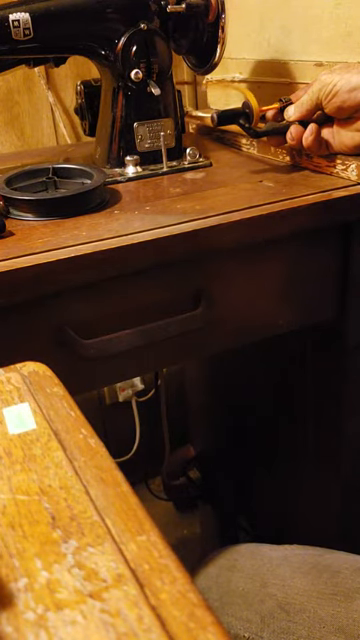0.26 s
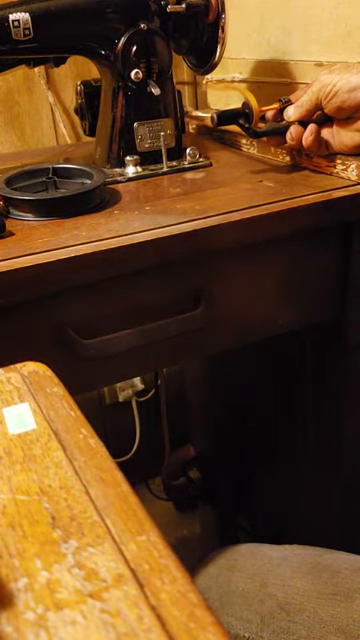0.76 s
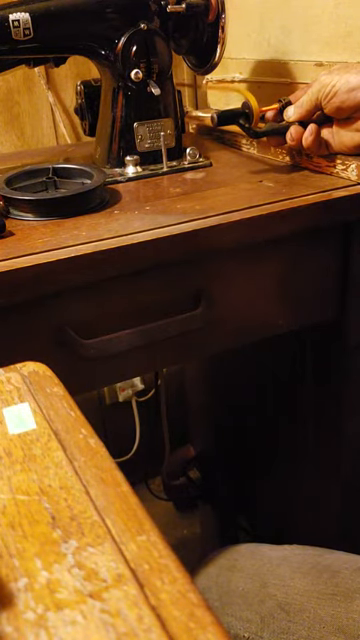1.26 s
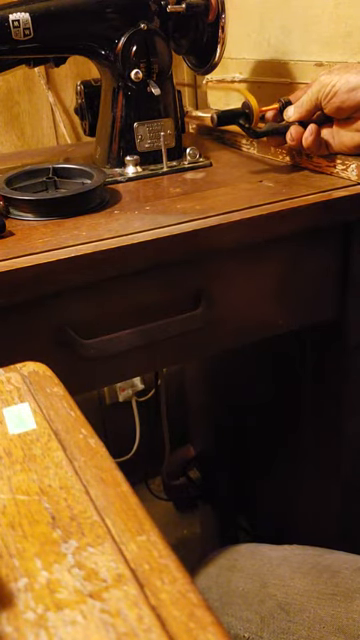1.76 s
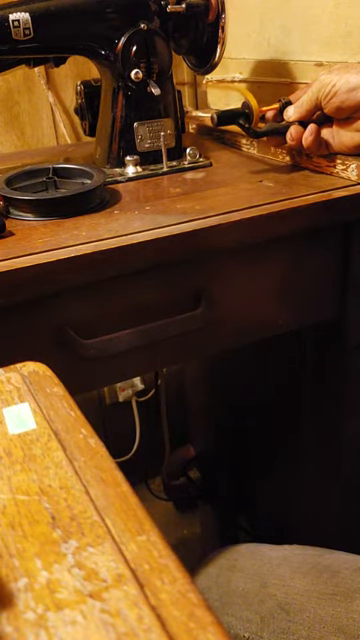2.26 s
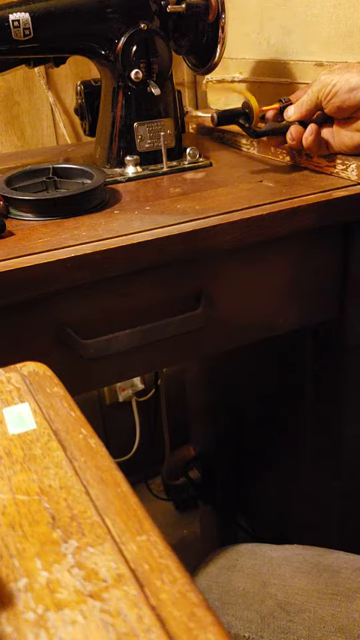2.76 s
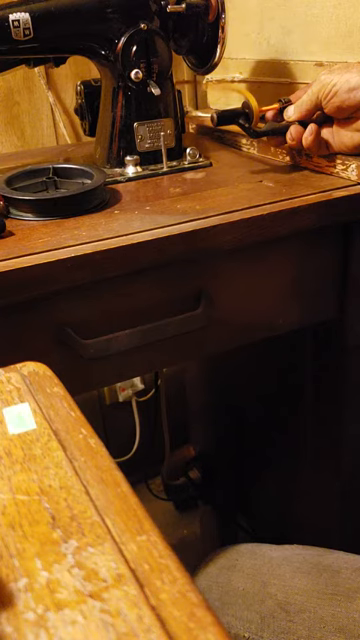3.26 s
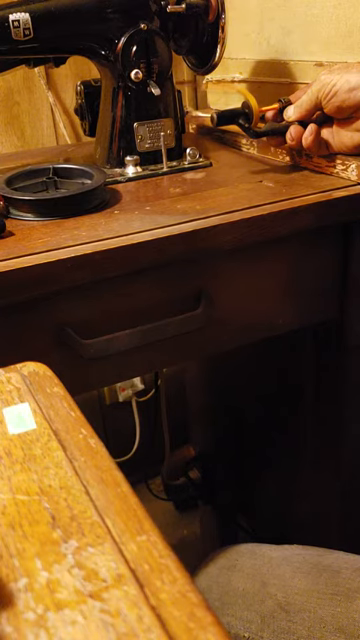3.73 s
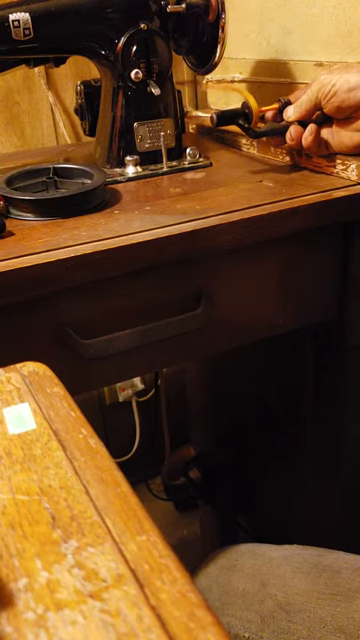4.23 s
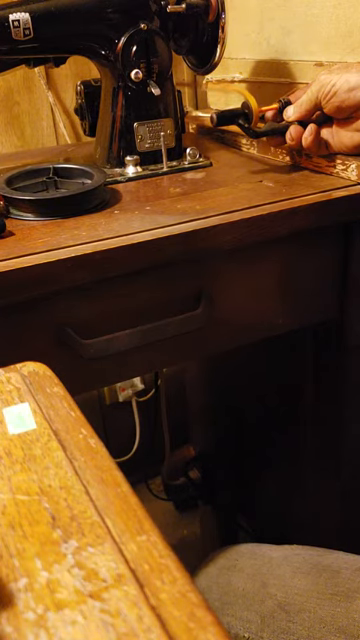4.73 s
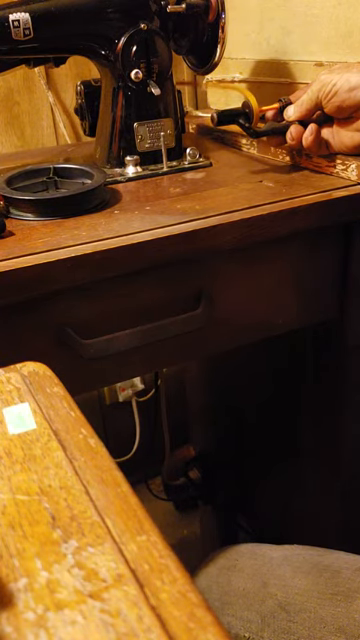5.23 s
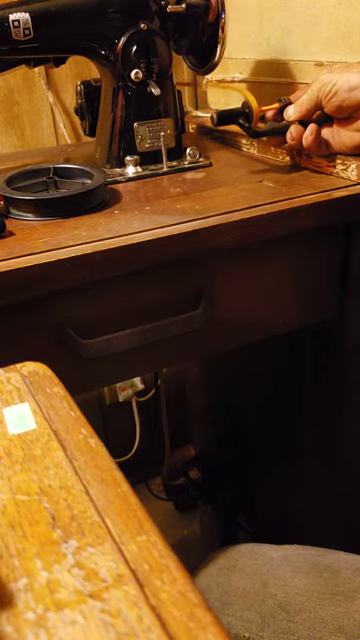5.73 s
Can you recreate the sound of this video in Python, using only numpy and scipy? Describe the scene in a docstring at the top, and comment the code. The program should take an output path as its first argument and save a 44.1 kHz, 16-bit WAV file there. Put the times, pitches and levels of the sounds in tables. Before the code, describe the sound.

An old sewing machine's small electric motor runs without a break while winding a bobbin. A strong low hum dominates, with thin metallic whines and brush hiss above. Pitch rises noticeably during the first second, then only creeps upward. A few faint rubs appear around two, three and five seconds. Close stereo pickup in a quiet room, treble brighter on the left.

```python
"""A small electric motor hums and whines as it speeds up to almost 200 turns a second, winding a bobbin on an
old sewing machine. Its unbalanced rotor hums through the table and shaft orders whine in the housing:
both are sines locked to one shaft angle. Brushes and fan hiss as coloured noise, with faint mains lines,
wavering lines under the low orders and a few soft rubs.
The left microphone port faces the motor; the right one is shadowed in the treble."""
import sys
import numpy as np
from scipy import signal
from scipy.fft import rfft, irfft, next_fast_len
from scipy.io import wavfile
from scipy.ndimage import uniform_filter1d, map_coordinates

SR = 44100
rng = np.random.default_rng(int(sys.argv[2]) if len(sys.argv) > 2 else 0)


def transcribe(u):
    """Save the signal u as a 16-bit wav file named by the first command-line argument.

    u: samples, shape (n,) or (channels, n), limited to [-1, 1]; the rate is SR.
    q: integer samples, one column per channel.
    """
    v = np.clip(np.atleast_2d(u).T, -1, 1)
    q = np.round(v * 32767).astype(np.int16)
    wavfile.write(sys.argv[1], SR, q)


N = 264159
PORT_GAP_S = 0.00048  # sound reaches the left port this much earlier

# Upper shaft orders and the housing resonances they cross, levels at the peak:
# (order, left [dB], right [dB], resonance [Hz], width [Hz])
WHINE_LINES = [(5, -51.5, -52.5, 947, 20), (6, -57, -53, 1174, 7), (7, -48, -43, 1309, 22),
               (10, -53.1, -71.9, 1945, 15), (10, -49.9, -74.9, 1967, 11), (12, -52.5, -56, 2270, 90),
               (12, -53.0, -61.3, 2359, 11), (12, -52.6, -60.6, 2332, 21), (12, -51, -52.5, 2368, 11),
               (14, -50.5, -61, 2555, 30), (14, -51.5, -63, 2735, 110), (15, -50.6, -64.4, 2895, 57),
               (16, -52.4, -62.3, 3155, 40), (17, -53, -62, 3350, 70), (19, -45.5, -60, 3605, 80),
               (19, -52, -61, 3730, 50), (21, -50.5, -63.1, 4135, 16), (21, -47.7, -72.7, 4200, 45),
               (23, -51.5, -64.5, 4540, 21), (24, -45.5, -62.2, 4725, 43), (25, -47.0, -58.9, 4993, 37),
               (27, -46.5, -60, 5290, 90), (27, -42, -53.8, 5400, 24), (28, -50.1, -64.7, 5475, 142),
               (30, -47.0, -68.7, 5710, 27), (30, -50.5, -66, 5870, 160), (31, -47, -65.2, 5800, 150),
               (32, -42.9, -60.6, 5792, 288), (34, -45.5, -60, 6445, 75), (34, -44.7, -58.7, 6788, 55),
               (36, -48.5, -70.3, 6930, 300), (37, -43.5, -60, 7015, 130), (37, -42, -59.7, 7280, 60),
               (39, -47, -65, 7230, 150), (39, -40.5, -57.7, 7634, 40), (40, -48, -62, 7830, 30),
               (43, -51.3, -62.8, 8458, 39), (44, -43.5, -56, 8500, 50), (44, -46.5, -55, 8635, 100),
               (45, -50.9, -59.3, 8634, 94), (47, -55.1, -63.7, 9000, 1200), (52, -47.5, -74.6, 10198, 86),
               (55, -43, -69.4, 10846, 171), (56, -45, -71.7, 10840, 170), (63, -42, -69.8, 12501, 219),
               (65, -41.3, -66.3, 12861, 58), (66, -44, -66, 12430, 130), (66, -38.8, -63.8, 13012, 59),
               (67, -45.9, -54.7, 13287, 68), (67, -43.3, -68.3, 13099, 475), (73, -39, -51, 14075, 70),
               (73, -36.1, -55.5, 14442, 66), (75, -39, -56, 14440, 90), (76, -41.5, -56, 14500, 500),
               (77, -40.5, -56, 14830, 60), (77, -35.5, -47.0, 15155, 160), (78, -37.5, -47.8, 15320, 80)]
# Strongest upper orders, before the motor shell colours them:
# (order, left level [dB], right against left [dB], left port's lead beyond the port gap [rad])
STRONG_LINES = [(11, -45.4, -4, -.9), (18, -63.2, -13, -1.6), (22, -27.2, -25, 0), (29, -63.3, -25, 0),
                (33, -28.5, -19, 0), (38, -40, -20, 0)]


def amp(db):
    """Decibels to linear gain."""
    return np.exp(np.asarray(db) * (np.log(10) / 20))


def unit(x):
    """Scale to an rms of one."""
    return x / np.sqrt(np.mean(x ** 2) + 1e-20)


def along(points, hz):
    """Interpolate (frequency [Hz], value) points on a log frequency axis."""
    f, v = np.transpose(points)
    return np.interp(np.log(hz + 1), np.log(f + 1), v)


def wobble(rate):
    """A smooth random curve with rate knots a second."""
    knots = rng.standard_normal(int(N * rate / SR) + 4)
    # a spline through the knots every 64 samples, then straight lines between
    coarse = map_coordinates(knots, [np.arange(0, N + 64, 64) * rate / SR])
    return np.interp(np.arange(N) / 64, np.arange(len(coarse)), coarse)


def filtered(x, response):
    """Shape the spectrum of x by a response of frequency."""
    m = next_fast_len(N + 8192)
    spectrum = rfft(x, m) * response(np.fft.rfftfreq(m, 1 / SR))
    return irfft(spectrum, m)[..., :N]


def tone(phase, lead, db):
    """A sine of rms level db at both ports, the left leading by lead radians."""
    return np.sqrt(2) * amp(db) * np.sin([phase + lead / 2, phase - lead / 2])


def bell(hz, centre, width):
    """A resonance curve: one at its centre, a half at half its width away."""
    return 1 / (1 + (2 * (hz - centre) / width) ** 2)


def response_db(rows, hz):
    """Peaks and dips (centre [Hz], width [Hz], one or more [dB]) summed at the given frequencies."""
    return sum(np.array(db)[:, None] * bell(hz, c, w) for c, w, *db in rows)


def random_phase():
    """A random starting phase in radians."""
    return rng.uniform(0, 2 * np.pi)


def patchy_noise():
    """Two independent noises whose levels swell and sink together in patches of time and frequency."""
    z = signal.stft(rng.standard_normal((2, N)), nperseg=512)[2]
    patches = rng.standard_normal(z.shape[1:])
    patches = uniform_filter1d(patches, size=5, axis=0)   # across frequency
    patches = uniform_filter1d(patches, size=12, axis=1)  # across time
    return signal.istft(z * amp(1.36 * unit(patches)), nperseg=512)[1][:, :N]


def brush_scrape(angle):
    """Brushes scrape a pattern that returns every turn: many shaft orders, each slowly varying in level."""
    # leave out order 20 and the orders that whine by themselves
    taken = [20] + [row[0] for row in [*WHINE_LINES, *STRONG_LINES]]
    orders = np.setdiff1d(np.arange(14, 81), taken)
    return sum(amp(3.5 * wobble(1.6)) * np.sin(k * angle + random_phase()) for k in orders)


def hiss(angle):
    """Brush and fan noise pulses with the shaft and reaches the two ports coloured and only partly alike."""
    # Broad hiss at each port, before the peaks and dips: (frequency [Hz], density [dB per Hz])
    left_hiss = [(20, -79), (120, -80.5), (310, -72.5), (420, -79), (1000, -83.5), (1500, -83.5),
                 (2400, -76), (4000, -77.5), (4800, -73.5), (7300, -74.5), (9000, -79), (11500, -75.5),
                 (14000, -66), (15700, -65)]
    right_hiss = [(20, -76.5), (120, -83), (310, -81), (550, -77), (950, -80), (1500, -79.5), (2200, -75.5),
                  (3000, -86.5), (6300, -89), (7000, -99), (7800, -78), (9500, -88), (12000, -94),
                  (12700, -93), (13400, -77.5), (15500, -79)]
    # Peaks and dips in the hiss spectrum: (centre [Hz], width [Hz], against the broad hiss [dB])
    peaks_and_dips = [(32.6, 5.9, 3), (190, 88, 11), (302, 48, -16), (963, 46, -7), (1220, 660, 6),
                      (1784, 153, -5), (2260, 90, -11), (2475, 99, -15), (2640, 1500, 2.5), (3015, 85, -10),
                      (3590, 113, 9.5), (3940, 90, -7), (4420, 90, 0), (5720, 36, 7), (6650, 66, -8),
                      (7220, 90, -8), (7210, 450, 7.5), (8130, 170, -3), (9000, 120, 0), (11900, 170, 5),
                      (14430, 200, 6)]
    # Likeness of the noise at the two ports: (frequency [Hz], left-right correlation [0 to 1])
    likeness = [(60, 0.9), (250, 0.85), (600, 0.26), (1500, 0.58), (3000, 0.1), (8000, 0.098),
                (15000, 0.19)]

    pulsing = 1 + .07 * np.sin(angle) + .07 * np.sin(2 * angle)
    pair = patchy_noise() * pulsing + .09 * brush_scrape(angle) * np.array([[1], [.3]])

    def mid_side_mix(hz):
        turn = np.arccos(np.clip(along(likeness, hz), -1, 1)) / 2
        return np.array([np.cos(turn), np.sin(turn)])

    def colour(hz):
        early_left = np.exp(1j * np.pi * hz * PORT_GAP_S * np.array([[1], [-1]]))
        hiss_db = np.array([along(left_hiss, hz), along(right_hiss, hz)])
        return early_left * amp(hiss_db + response_db(peaks_and_dips, hz))

    mid, side = filtered(pair, mid_side_mix)
    # the factor turns white noise of unit rms into unit density per Hz
    return np.sqrt(SR / 2) * filtered(np.array([mid + side, mid - side]), colour)


def field(angle):
    """The magnetic field pulses at twice the mains rate: a hum, and lines split off the shaft orders."""
    field_hz = 119.9
    # Split lines, mean levels; order 0 is the plain hum: (order, side [+1 above, -1 below], left [dB], right [dB])
    split_lines = [(0, 1, -58, -58), (2, -1, -65, -65), (3, -1, -68, -66), (5, -1, -66, -65),
                   (6, 1, -63, -56), (14, -1, -57, -65), (19, -1, -54, -70)]
    out = np.zeros((2, N))
    pulse = 2 * np.pi * field_hz * np.arange(N) / SR
    for k, side, left_db, right_db in split_lines:
        level = np.array([[left_db], [right_db]]) + 1.6 * wobble(1.41) + 3.2 * wobble(16)
        phase = k * angle + side * (pulse + 0.4 * wobble(16)) + random_phase()
        out += tone(phase, rng.uniform(0, k), level)
    return out


def belt(angle):
    """Faint lines, perhaps from the belt, waver in phase and level about a quarter order under low orders."""
    # Belt lines, mean levels: (multiple of shaft speed, level [dB])
    belt_lines = [(2.76, -60), (3.76, -67)]
    return sum(tone(k * angle + 1.0 * wobble(12), 0, db + 1.1 * wobble(4.9)) for k, db in belt_lines)


def rubbing():
    """Soft rubs near 1.3 kHz: short tones rough in pitch and level, quick to start, stronger on the right."""
    # Rubs, mean rms level at the envelope's top, right port: (time [s], length [s], pitch [Hz], level [dB])
    rub_events = [(1.97, .045, 1140, -52), (1.98, .045, 1295, -46), (2.02, .03, 1440, -47),
                  (2.17, .02, 1130, -52), (3.1, .05, 1120, -55), (3.14, .05, 1350, -50),
                  (3.3, .022, 1300, -47), (3.39, .025, 1290, -45), (3.39, .03, 1130, -50),
                  (5.25, .08, 1300, -53)]
    t = np.arange(N) / SR
    rubs = np.zeros(N)
    for start, length, hz, db in rub_events:
        u = (t - start) / length
        envelope = np.exp(-np.where(u < 0, u ** 4, u ** 2))  # steeper rise than fall
        rough_tone = np.sin(2 * np.pi * hz * t + 1.3 * wobble(100))
        rubs += amp(db + 2.5 * wobble(70)) * envelope * rough_tone
    return np.sqrt(2) * rubs * amp([[-6], [0]])


def whine(angle, speed):
    """Upper orders swell near housing and shell resonances; a slight shaft shudder widens the high ones."""
    # Motor shell peaks and dips that the strongest orders sweep through: (centre [Hz], width [Hz], gain [dB])
    shell = [(2022.9, 34.3, -28.6), (2089.8, 37.4, -8.4), (2128.1, 10.3, -6.4), (2174, 11.7, -6.5),
             (3464.1, 15.2, -9.9), (3536.7, 7.7, -5.2), (3539.0, 131.0, 23.2), (3548.5, 6.4, 4.1),
             (3572.3, 10.0, 6.7), (4043.8, 241.5, -16.5), (4050, 70, -8), (4223.1, 90.8, -13.5),
             (4262, 20, -9.5), (4385.5, 73.0, -12.4), (5593.5, 3.8, -31.0), (5624.7, 22.5, 4.0),
             (5711.7, 179.4, 26.5), (6035, 60, -13), (6159.9, 456.3, -17.5), (6355.7, 55.5, -11.7),
             (6390.1, 4.1, -31.0), (6438.3, 11.2, -7.0), (6521.9, 79.6, -12.4), (6974.3, 140.0, -9.8),
             (7122.8, 120.1, -8.5), (7432.2, 6.0, -3.0), (7519.4, 11.2, -31.0), (7531.8, 101.6, -9.2)]
    # Phase of some housing orders: {order: left port's lead beyond the port gap [rad]}
    extra_lead = {5: -.9, 7: .8, 10: -1.5}

    lines = []
    for k, left_db, right_offset_db, lead in STRONG_LINES:
        level = left_db + np.array([[0], [right_offset_db]]) + response_db(shell, k * speed)
        lines.append((k, level, lead))

    # an order that crosses several resonances adds up their powers
    power = {}
    for k, left_db, right_db, hz, width_hz in WHINE_LINES:
        near_db = np.maximum(10 * np.log10(bell(k * speed, hz, width_hz)), -20)
        power[k] = power.get(k, 0) + amp(2 * (np.array([[left_db], [right_db]]) + near_db))
    for k, p in power.items():
        lines.append((k, 10 * np.log10(p) + 1.6 * wobble(2.42), extra_lead.get(k, 0)))

    out = np.zeros((2, N))
    shaken = angle + .0025 * wobble(60)
    for k, db, lead in lines:
        lead = lead + 2 * np.pi * k * speed * PORT_GAP_S + 0.6 * wobble(0.83)
        out += tone(k * shaken + random_phase(), lead, db + .9 * wobble(30))
    return out


def hum(angle, speed):
    """The unbalanced rotor's low orders are nearly steady sines, coloured by a slightly trembling table and frame."""
    # Low shaft orders before the frame colours them: (order, left [dB], right [dB])
    low_orders = [(1, -19.5, -20.6), (2, -71.1, -73), (3, -65.8, -65), (4, -38.3, -32.9), (8, -37.7, -40.4)]
    # Table and frame peaks and dips: (centre [Hz], width [Hz], left gain [dB], right gain [dB])
    frame = [(187.0, 5.3, 0.8, 1.8), (194.5, 2.8, 0.9, 0.6), (218.6, 34.0, -18.1, -16.2),
             (378.6, 9.1, 9.7, 16.0), (384.2, 2.4, -13, -9), (385.4, 5.1, -6.0, -17.1),
             (395.9, 32.9, 26.5, 23.2), (562.5, 18.3, 15.4, 14.4), (570.7, 10.0, 4.6, 9.0),
             (577.1, 4.1, -11.2, -0.0), (589.9, 3.5, -0.2, -13.3), (598.5, 25.8, 17.9, 23.7),
             (733.4, 5.5, -15.8, -4.7), (745.2, 15.2, -10.9, -11.6), (754.8, 8.1, -6.4, -18.8),
             (781.1, 13.3, -5.1, -6.2), (795.0, 11.2, -1.6, -3.8), (1475.1, 21.9, -0.6, -7.2),
             (1526.2, 12.2, -4.5, -4.5), (1540.3, 8.2, 0.9, -8.5), (1552.5, 10.8, -6.2, 3.8),
             (1553.3, 3.5, 3.5, -18.2), (1572.1, 7.2, -3.0, -2.1)]
    # Phase between the ports: (frequency [Hz], left port's lead [rad])
    frame_lead = [(182, .15), (199, .2), (365, .5), (386, .4), (389, 1.2), (397.5, 1.6), (547, .7),
                  (586, .3), (589, .5), (590.5, 1.7), (596, 1.8), (729, -.8), (765, -.2), (774, .6),
                  (781, 1.4), (787, 1.55), (792, 2.4), (795, 2.7), (1460, -1.6), (1475, -2.6), (1510, -2.7),
                  (1528, -1.5), (1539, -1.4), (1542, -3), (1550, -2.2), (1553, -1.2), (1557, -3.1),
                  (1564, -2.2), (1576, -2), (1582, -1.6), (1590, -1.6)]
    out = np.zeros((2, N))
    for k, left_db, right_db in low_orders:
        flutter_db = (0.047 + 0.092 * k) * (wobble(20) + 0.64 * wobble(55))
        level = np.array([[left_db], [right_db]]) + response_db(frame, k * speed) + flutter_db
        phase = k * angle + random_phase() + 0.044 * wobble(30)
        out += tone(phase, along(frame_lead, k * speed), level)
    return out


def scene():
    """The motor speeds up; one shaft angle drives every layer but the rubs."""
    # Shaft speed: (time [s], speed [turns per s])
    speed_curve = [(0.0, 182.1), (0.25, 185.07), (0.55, 189.17), (0.7, 190.72), (0.85, 191.97),
                   (1.0, 192.56), (1.3, 193.21), (1.6, 193.39), (1.9, 193.76), (2.2, 194.43), (2.5, 195.51),
                   (3.0, 195.95), (3.5, 196.29), (4.0, 196.86), (4.5, 197.55), (5.0, 198.08), (5.5, 198.51),
                   (5.99, 198.72)]
    times, turns = np.transpose(speed_curve)
    speed = np.interp(np.arange(N) / SR, times, turns)
    angle = 2 * np.pi * np.cumsum(speed) / SR
    background = hiss(angle) + field(angle) + belt(angle) + rubbing()
    return background + whine(angle, speed) + hum(angle, speed)


def record(dry):
    """A sharp band limit removes everything from 15750 Hz up."""
    return filtered(dry, lambda hz: hz < 15750)


dry = scene()
out = record(dry)
transcribe(out)
```